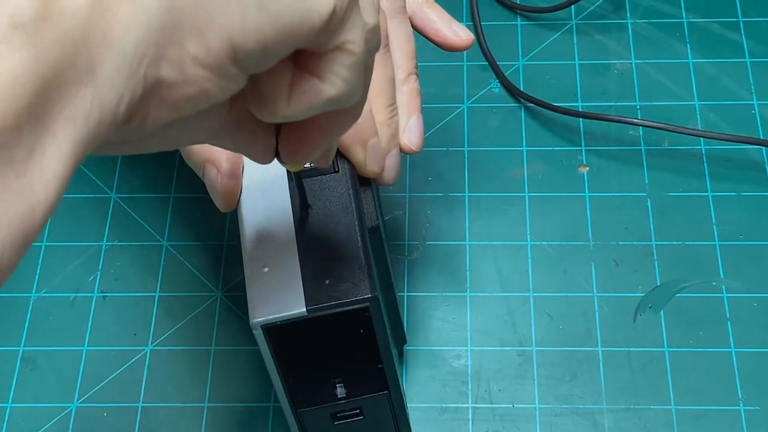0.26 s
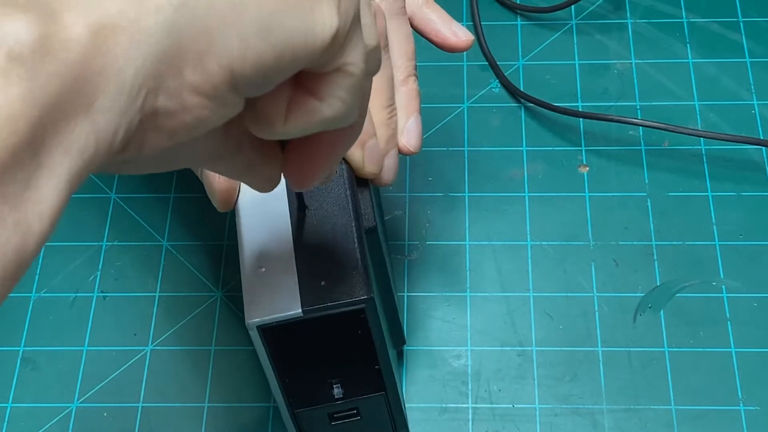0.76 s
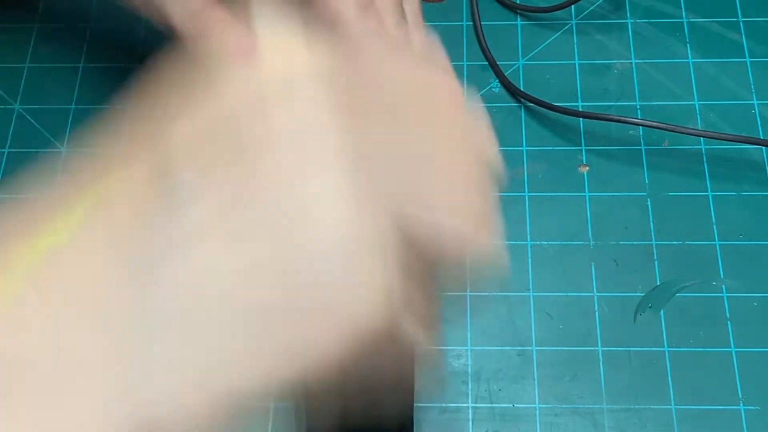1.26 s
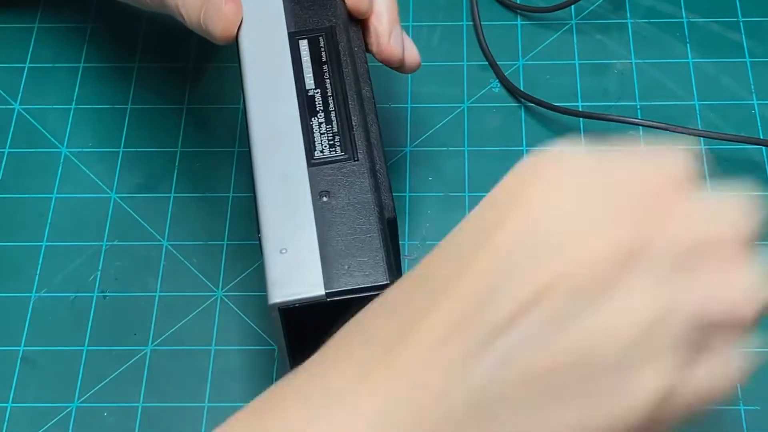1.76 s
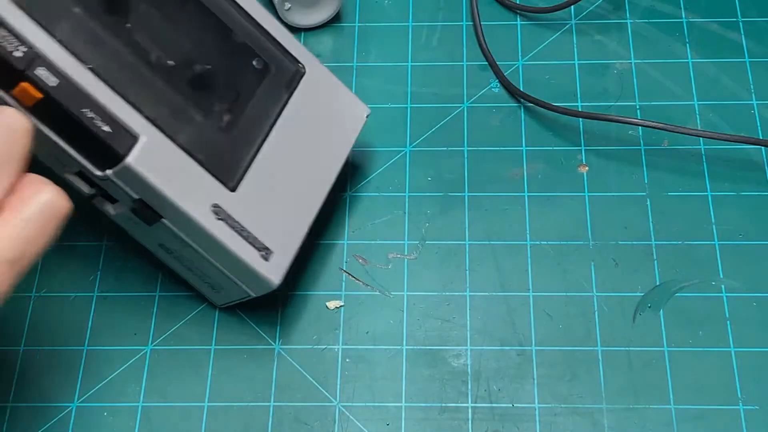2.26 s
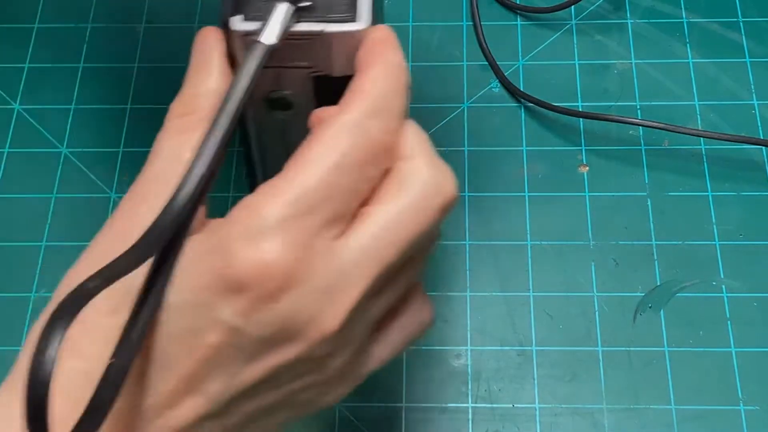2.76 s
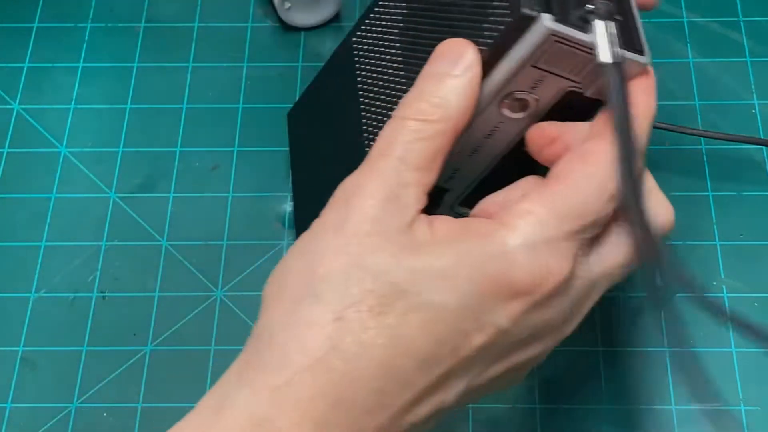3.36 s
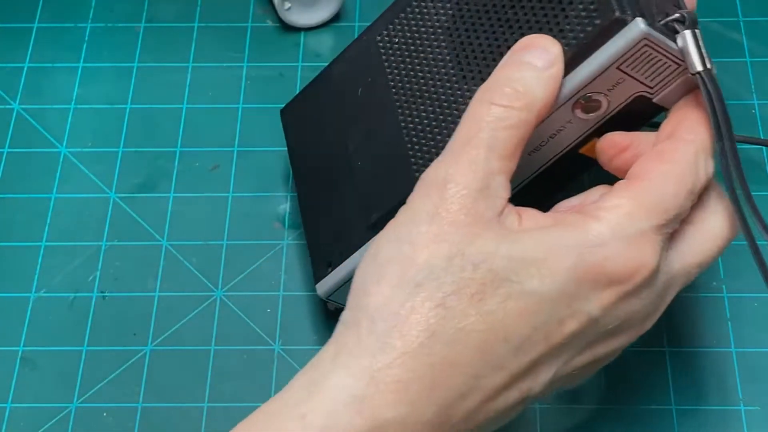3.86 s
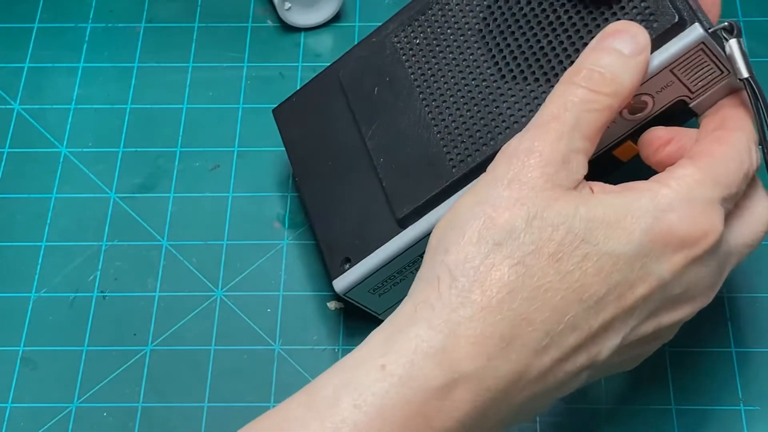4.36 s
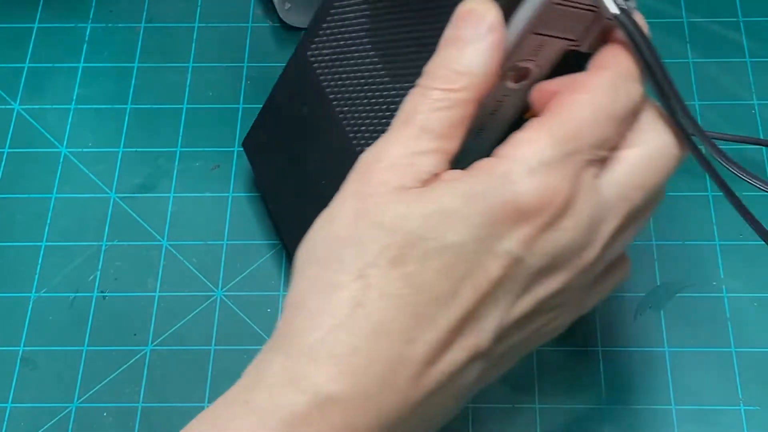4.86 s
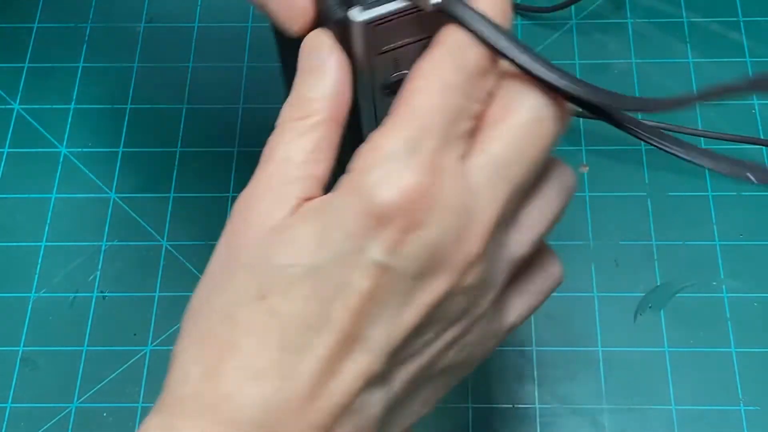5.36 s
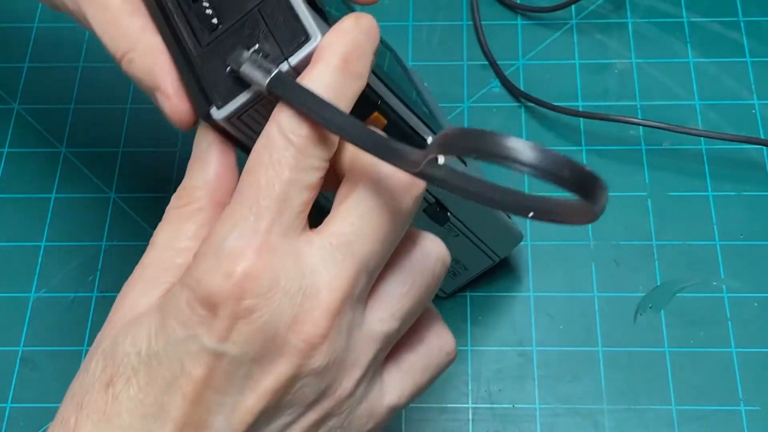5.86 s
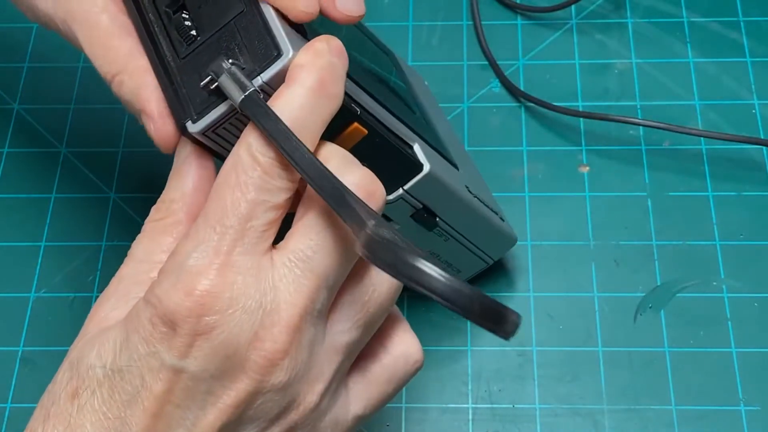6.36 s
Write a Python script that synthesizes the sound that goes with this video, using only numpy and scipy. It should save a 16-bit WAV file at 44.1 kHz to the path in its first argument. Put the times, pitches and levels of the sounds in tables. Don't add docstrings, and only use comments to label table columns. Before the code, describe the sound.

A small plastic-cased device is handled on a padded bench, close stereo microphone, light room tail. Quiet clicks and sliding skin come first, then a hard cracking blow with short metallic rattle, by far the loudest. A second lighter knock is followed by deep soft thumps, near silence with tiny taps, a rough plastic scrape and knock, and a few crisp closing clicks.

```python
import sys
import numpy as np
from scipy import signal
from scipy.fft import rfft, irfft, next_fast_len
from scipy.io import wavfile
from scipy.ndimage import uniform_filter1d

SR = 44100
rng = np.random.default_rng(int(sys.argv[2]) if len(sys.argv) > 2 else 0)


def invert_db(x):
    u = np.asarray(x, float) / 20
    return 10 ** u


def wrap_up_sound(samples):
    columns = np.atleast_2d(samples).T
    tamed = np.clip(columns, -1, 1)
    steps = np.round(tamed * 32767).astype(np.int16)
    wavfile.write(sys.argv[1], SR, steps)


N = 291942

# t/s, peak level/dB, crack above body/dB, panel f/Hz, left minus right/dB
TAPS = [(0.134, -56, -18, 2170, 5), (0.839, -58, -27, 1800, 0), (2.631, -43, -19.5, 1364, 19),
        (2.708, -44, -22, 1250, 6), (2.77, -36, -20, 1165, 6), (3.029, -53, -17, 1374, 7),
        (3.201, -53, -24, 1620, 3), (3.416, -36, -21, 2060, 2.5), (4.36, -47.5, -38.5, 657, -2),
        (5.099, -55, -13.5, 1390, -3.5), (5.12, -48, -22.5, 1524, 8), (5.732, -46.5, -27, 1320, 5),
        (5.75, -46.5, -26, 1080, 4), (5.955, -48, -22, 1380, 6), (6.007, -40, -32, 1813, 2.5),
        (6.171, -52.5, -33, 1600, 6)]
# t/s, peak level/dB, crack above body/dB, panel f/Hz, left minus right/dB
CLICKS = [(0.209, -52.5, -11, 2170, 3), (0.944, -33.5, -8, 2010, 4.5), (1.078, -34.5, -4.5, 1080, 8),
          (1.664, -34.5, -8.5, 1760, 5.5), (2.121, -50.5, -9, 794, -3), (2.15, -32, -10, 1000, -2),
          (2.393, -50, -13, 1537, 2), (2.545, -23, -13.5, 1128, 8.5), (3.328, -43, -14.5, 2506, 8),
          (3.915, -39.5, -13.5, 1618, -1), (4.888, -39, -4.5, 2274, 5.5), (5.625, -25, -6.5, 2722, 2.5),
          (5.654, -52, -14, 1400, 5), (6.26, -26, -3.5, 2450, 6.5)]
# t/s, peak level/dB, crack above body/dB, panel f/Hz, chatter/ms
KNOCKS = [(1.496, -11, -10.5, 3300, 1.9), (1.534, -10, -20, 950, 1.2), (1.542, 0.5, -8.5, 2280, 5),
          (1.559, -16.5, -18, 2916, 4), (2.515, -10, -3.5, 1260, 2.9), (2.524, -16.5, -18.5, 1294, 2.4),
          (5.372, -20, -18.5, 1306, 7.4), (1.497, -22.5, -32, 975, 6.4), (1.543, -15.5, -18, 791, 5.5),
          (1.497, -23, -40, 460, 3.9), (1.535, -20.5, -38.5, 396.8, 7), (1.652, -38.5, -39, 330, 7.7),
          (5.361, -29.5, -28.5, 1354, 1.78)]
# t/s, peak level/dB, crack above body/dB, panel f/Hz, chatter/ms
MORE_KNOCKS = [(1.102, -26, -1, 1240, 1.9), (1.128, -30.5, -8.5, 2020, 1.97), (1.176, -34, -13, 2290, 2.5),
               (1.295, -30.5, 6.5, 4260, 1), (1.464, -40.5, -9, 3102, 4), (1.0664, -40, -8.5, 1210, 3),
               (1.4988, -10, -9, 3540, 2), (1.5385, -13, -20, 1035, 1.8), (1.549, -9, -9.5, 2900, 2.5),
               (2.5187, -13, -4.5, 1312, 2.4), (2.5216, -15, -6, 1000, 2.5), (5.275, -39.5, -32, 1228, 3.05),
               (5.339, -33.5, -11.5, 3870, 1.5)]
TAP_CHATTER_MS, CLICK_CHATTER_MS, KNOCK_PAN_DB, MORE_KNOCK_PAN_DB = 6.3, 2.8, 4.5, 2.5
# f/Hz, level/dB, t60/s
CASING_MODES = [(330, -8.5, 0.043), (420, -2, 0.12), (536, -13, .035), (710, -11, 0.068), (870, -15, 0.026),
                (950, -8.5, 0.052), (1080, 6.5, 0.04), (1240, -4.5, 0.026), (1320, 6, 0.0082),
                (1420, 0.5, 0.033), (1572.3, -1.5, 0.085), (1923, 3.5, 0.03), (2014, -2, 0.04),
                (2450, 1.5, 0.015), (2830, 3.5, 0.066), (3030, 4, 0.005), (3300, 0, 0.007), (3550, -2, .02),
                (4030, 1.5, .02), (4290, 2.5, .02)]
# f/Hz, level/dB
CRACK_SPECTRUM = [(1500, -26.5), (3000, -12), (5000, -8.5), (6500, -6.5), (8000, -1.5), (10000, 2.5),
                  (12000, -2), (14000, -8), (15900, -8), (17000, -32)]

# t/s, f/Hz, peak level/dB, t60/s
STEEL_STRIKES = [
    (1.5435, 9800, -11, 0.03),
    (1.5445, 12800, -20, 0.06),
    (1.559, 8300, -23, .05),
    (1.5438, 6600, -29, 0.1),
    (1.6, 10500, -26, 0.04),
]
STEEL_MODES = [-0.071, 0.0011, 0, .017, 0.0028]

# t/s, hold/s, level/dB, rise/(s per 20 dB), fall/(s per 20 dB)
SCRAPES = [(0.0, .003, -60, .012, .05), (.06, .17, -77, .02, .1), (1.075, .06, -59, .016, .1),
           (1.19, .02, -60, .03, .06), (1.465, .02, -60, .02, .05), (1.505, .025, -38, .01, .02),
           (2.15, .02, -56, .03, .045), (2.42, .045, -65, .08, .05), (2.555, .004, -45, .021, .055),
           (2.636, .02, -52, .015, .06), (2.765, .02, -61, .14, .05), (2.86, .03, -67, .15, .25),
           (3.315, .03, -65, .05, .05), (3.92, .035, -57, .03, .06), (4.262, .1, -74, .18, .08),
           (4.976, .02, -73, .05, .15), (5.28, .06, -41, .03, .012), (5.38, .03, -40, .008, .06),
           (5.44, .02, -43, .03, .04), (5.35, .012, -56, .01, .01), (5.856, .005, -70, .1, .09),
           (6.335, .01, -63, .06, .07), (6.6, .03, -66, .08, .05)]
# t/s, hold/s, level/dB, rise/(s per 20 dB), fall/(s per 20 dB)
SWIPES = [(0.0, 0.0023, -57, .01, 0.032), (1.072, 0.0085, -53.5, .014, .04),
          (1.14, 0.092, -47.5, 0.073, .16), (1.305, 0.013, -54.5, .05, 0.19),
          (1.469, 0.0033, -54.5, .015, 0.042), (2.09, .04, -67.5, .05, .04), (2.43, 0.11, -61, .14, 0.057),
          (2.56, 0.0027, -49.5, .03, 0.051), (2.654, 0.0037, -56, 0.023, 0.101),
          (2.79, 0.0021, -59.5, 0.0412, 0.0356), (2.864, 0.018, -56.5, 0.0732, 0.088),
          (3.296, .1, -67.5, 0.041, 0.054), (3.92, 0.037, -60, 0.0301, 0.0596),
          (4.262, 0.0497, -73, 0.17, .15), (4.9, .003, -63.5, 0.0088, 0.0585),
          (4.99, .025, -66, 0.061, 0.0992), (5.264, .03, -59.5, 0.025, .1),
          (5.334, 0.0041, -48, 0.059, .018), (5.385, 0.0094, -42.5, .01, 0.065),
          (5.64, .003, -65, .01, 0.092), (6.275, 0.033, -62.5, .01, 0.126)]
# t/s, hold/s, level/dB, rise/(s per 20 dB), fall/(s per 20 dB)
DRAGS = [(1.078, 0.081, -59, 0.0167, 0.083), (2.134, 0.063, -61.5, 0.034, .035),
         (2.56, .003, -53, 0.039, 0.039), (2.76, 0.034, -52, 0.12, 0.034), (3.335, 0.011, -60.5, .07, 0.04),
         (3.92, .03, -66.5, .04, .05), (4.364, 0.0029, -53.5, .032, .06), (5.264, 0.11, -60, 0.016, 0.041),
         (5.385, .004, -40, 0.02, 0.033), (5.479, 0.00281, -57.5, .1, 0.025), (5.99, .03, -63.5, .06, .045)]
# delay/s, level re its peak/dB, fall/(s per 20 dB)
SETTLE = [
    (0.01, -28, 0.09),
    (.012, -34, 0.19),
]
# f/Hz, level/dB (per Hz for plastic and mat)
SCRAPE_SPECTRUM = [(530, -39), (900, -11), (1000, -5), (1110, -14), (1320, 0), (1530, -8), (1660, -1),
                   (2080, -10), (2470, -2), (3010, -9), (3960, -7), (4410, -20), (6500, -22), (8450, -52),
                   (14300, -120)]
SKIN_SPECTRUM = [(3000, -14), (5000, -6), (7500, -5), (9500, 1.5), (11500, 1.5), (13500, -4), (15500, -0.5),
                 (17000, -29.5)]
DRAG_SPECTRUM = [(120, -41), (200, -7), (501, -6.5), (651, -6.5), (936, -17.5), (1060, -7), (1500, -21.5),
                 (1950, -51), (3300, -120)]
STROKE_BEND = 1.4

# t/s, length/s, level/dB, start f/Hz, end f/Hz
RASPS = [(1.116, .12, -60, 3010, 2580), (1.131, .2, -59.5, 2101, 3594), (1.299, 0.18, -72, 2810, 3000),
         (5.267, 0.089, -53, 2503, 3710), (5.305, 0.037, -55, 7800, 7860),
         (5.324, 0.021, -50.5, 5000, 5580), (5.375, 0.11, -35.5, 2550, 2370), (5.378, .07, -43, 4000, 3850),
         (5.376, 0.12, -39, 1345, 1299), (5.373, 0.074, -52, 6600, 6280), (1.509, 0.03, -48, 3200, 2977),
         (1.552, .06, -36, 2900, 2700)]
RASP_WIDTH, RASP_EDGE_S, RASP_GRAIN_DB = .15, .01, 3.5
RASP_FALL_DB, RASP_SWELL_DB = -11, 7

# t/s, f/Hz, peak level/dB, t60/s
PINGS = [(0.9454, 1040, -46, 0.016), (0.945, 2660, -45.5, .02), (2.151, 1005, -49, 0.038),
         (3.196, 1054, -58, 0.039), (3.329, 2487, -46.5, 0.055), (3.329, 1040, -51.5, .05),
         (3.331, 1575, -52, .04), (3.418, 1664, -46, 0.037), (3.42, 1206, -54, 0.058),
         (4.889, 3200, -52.5, .02), (5.12, 1246, -46.5, 0.026), (5.122, 641, -43.5, 0.051),
         (5.15, 590, -60, 0.038), (5.626, 2650, -44, 0.025), (5.628, 888, -48.5, .04),
         (5.733, 2610, -55, 0.018), (5.751, 634, -53, 0.036), (5.751, 1890, -54, 0.025),
         (5.957, 1402, -53, 0.031), (5.956, 3610, -57, 0.014), (6.008, 3200, -52.5, .015),
         (6.172, 1590, -45.5, 0.038), (6.174, 994, -56, 0.028), (6.261, 2540, -40, 0.021),
         (6.262, 1420, -44, 0.045), (6.259, 3810, -48, .02), (6.263, 650, -49.5, 0.034),
         (1.177, 2810, -38, .03), (1.177, 1860, -42, .025), (1.5352, 4530, -17.5, .008)]
PING_ATTACK_S, PING_CHATTER_S, PING_PAN_DB, PING_TRIM_DB = .001, .001, 3, -3.5
PING_GRIP = 0.83

# t/s, peak level/dB, f/Hz, t60/s
BOOMS = [(0.094, -42, 86.5, 0.25), (0.225, -47.5, 82, 0.23), (0.48, -51.5, 84, 0.15),
         (0.523, -55, 75, 0.088), (0.564, -53, 67, 0.17), (1.154, -40, 86, 0.24), (1.179, -46, 173.2, 0.3),
         (1.208, -38, 70, 0.089), (1.366, -52, 51.4, 0.3), (1.494, -34.5, 138.8, 0.78),
         (1.533, -26, 139.7, 0.28), (1.651, -46, 72, 0.17), (1.762, -54, 67, 0.41),
         (2.409, -48.5, 61.5, 0.28), (2.441, -50.5, 48.9, 0.12), (2.544, -32.5, 71.5, 0.22),
         (2.613, -47, 66, 0.31), (2.734, -31.5, 83.2, 0.28), (2.781, -25, 117.7, 0.18),
         (2.808, -26, 85.6, 0.18), (3.922, -47, 79.7, 0.32), (5.379, -21.5, 79, 0.31),
         (5.419, -25.5, 67, 0.11)]
# multiple of f, level/dB, share of t60
BENCH_MODES = [
    (1, 2.5, 0.59),
    (.62, -9, 1.1),
    (2.2, -12, 0.58),
    (3.8, -19, .6),
]
# t/s, level/dB
RUMBLE = [(0.0, -59), (0.31, -72.5), (0.44, -69), (0.81, -85), (1.03, -65), (1.691, -63), (1.94, -73),
          (2.38, -72), (2.49, -58), (2.621, -65), (2.75, -57), (3.02, -67.5), (3.89, -73.5), (4.1, -90),
          (5.179, -81), (5.4, -55), (5.62, -67.5), (6.62, -74)]
# f/Hz, level/dB
RUMBLE_SPECTRUM = [(30, -22.0), (45, 0.5), (60, -8), (82, 0), (110, -10.0), (170, -8.5), (250, -24.5)]

# f/Hz, near level/dB, near t60/s, far level/dB, far t60/s
ROOM = [(517, -11.5, 0.35, -22, 1), (1500, -6.5, 0.12, -22.5, 1.5), (4100, -7.5, 0.16, -23, 1.1),
        (10100, -14.5, 0.21, -27.5, 1.1), (15000, -16, .17, -30.5, 1.1)]
# f/Hz, level/dB per Hz
HISS_SPECTRUM = [(15, -41), (25, -11), (49, -3), (123, -13), (241, -18.5), (437, -17.5), (655, -24),
                 (730, -23), (858, -24), (1060, -25), (1390, -27), (3890, -32.5), (15800, -39.5)]
HISS_DB = -70
SHARED_HZ, LAG_S, IN_PHASE_HZ = 5900, .000222, 6950


def taps():
    out, t = np.zeros((2, N)), np.arange(4096) / SR
    hz, db, t60 = np.array(CASING_MODES).T
    light = [(*row, TAP_CHATTER_MS) for row in TAPS] + [(*row, CLICK_CHATTER_MS) for row in CLICKS]
    knocks = [(*row[:-1], KNOCK_PAN_DB, row[-1]) for row in KNOCKS]
    ticks = [(*row[:-1], MORE_KNOCK_PAN_DB, row[-1]) for row in MORE_KNOCKS]
    hits = knocks + sorted(light) + ticks
    chance = rng.standard_normal((len(hits), 4096 * 2 + 5 * len(CASING_MODES)))
    sides = np.array([[1], [-1]])
    for (s, peak_db, crack_db, spot_hz, pan_db, ms), c in zip(hits, chance):
        chatter = np.exp(-t / (max(ms, .3) / 1000))
        force = c[:1024] * invert_db(c[1024:2048]) * chatter[:1024]
        force[0] = 6.0
        size, tilt, phase, other, grip = c[8192:].reshape(5, -1)

        softness = 1 - invert_db(min(crack_db, 0))
        reach = 0.97 + .5 * (1 - softness)
        near = 1 / (1 + (np.log(hz / spot_hz) / reach) ** 2) ** 2
        gain = invert_db(db + 1.5 * size + 1.1 * tilt * sides) * near
        gain = gain * np.exp(1j * (phase + 0.65 * other * sides))

        modes = fade(t, np.minimum(t60, .007 + 20 / hz)[:, None])
        modes = modes * np.exp(2j * np.pi * (hz * (1 + 0.03 * grip))[:, None] * t)
        spot = np.sin(2 * np.pi * spot_hz * t) * fade(t, min(40 / spot_hz, .03))
        ring = (gain @ modes).imag + 3.5 * softness * spot

        edges_hz = .62 * spot_hz, min(spot_hz * (1.8 + 14 * invert_db(crack_db)), 9000)
        ring = signal.sosfilt(signal.butter(2, edges_hz, "band", fs=SR, output="sos"), ring)
        body = signal.fftconvolve(ring, force[None])[:, :4096]

        crack_decay = chatter + .5 * np.exp(-t / .0005) + .13 * fade(t, .11)
        crack = colour(c[4096:8192], CRACK_SPECTRUM) * crack_decay * (1 - np.exp(-t / .0001))
        hit = body / abs(body).max() + invert_db(crack_db + 9.5) * crack / abs(crack).max()
        hit = hit * np.cos(np.linspace(0, np.pi / 2, 4096))
        add(out, hit / abs(hit).max() * invert_db(peak_db + pan_db * sides / 2), s + .001)
    return out


def blade():
    out, t = np.zeros((2, N)), np.arange(SR // 3) / SR
    for (s, hz, peak_db, t60), c in zip(STEEL_STRIKES, rng.standard_normal((len(STEEL_STRIKES), 512))):
        ring = sum(np.sin(2 * np.pi * hz * (1 + share) * t) for share in STEEL_MODES) * fade(t, t60)
        hit = signal.fftconvolve(ring, c * np.exp(-t[:512] / .002))
        add(out, np.array([hit, hit]) * invert_db(peak_db) / abs(hit).max(), s)
    return out


def rubbing():
    plastic_gain = strokes(SCRAPES + settling(TAPS + CLICKS, SETTLE[0]))
    skin_gain = strokes(SWIPES)
    mat_gain = strokes(DRAGS + settling(TAPS, SETTLE[1]))
    plastic_grain = invert_db(2.8 * walk(800) + .8 * walk(60))
    scrape = unit(colour(pair(900) * plastic_grain, SCRAPE_SPECTRUM))
    skin_grain = invert_db(2.1 * walk(500) + 1.1 * walk(40))
    skin = unit(colour(rng.standard_normal(N) * skin_grain, SKIN_SPECTRUM))
    drag = unit(colour(pair(930) * invert_db(1.5 * walk(120)), DRAG_SPECTRUM))
    return (scrape * plastic_gain + drag * mat_gain) * [[1.15], [.87]] + skin * skin_gain * 0.92


def settling(contacts, settle):
    delay, db, fall = settle
    return [(row[0] + delay, 0, row[1] + db, delay, fall) for row in contacts]


def strokes(rows):
    t, gain = np.arange(N) / SR, np.zeros(N)
    for s, hold, db, rise, fall in rows:
        i = max(int((s - 3 * rise) * SR), 0)
        j = int((s + hold + 3 * fall) * SR)
        outside = np.maximum((s - t[i:j]) / rise, (t[i:j] - s - hold) / fall)
        stroke = invert_db(db - 20 * np.maximum(0, outside) ** STROKE_BEND)
        gain[i:j] = np.hypot(gain[i:j], stroke)
    return gain


def rasps():
    out, blows = np.zeros((2, N)), np.array([row[0] for row in KNOCKS + MORE_KNOCKS])
    for s, length, db, from_hz, to_hz in RASPS:
        n = int(length * SR)
        u = np.arange(n) / n
        slips = rng.standard_normal((3, 12288))
        grain = invert_db(RASP_GRAIN_DB * unit(uniform_filter1d(slips[2], size=110)))
        force = (slips[0] + .5 * slips[:2]) * grain
        sway = signal.lfilter(*signal.butter(2, RASP_WIDTH * from_hz, fs=SR), force)[:, -n:]
        phase = 2 * np.pi * np.cumsum(from_hz + (to_hz - from_hz) * u) / SR
        struck = np.any((s - blows > 0) & (s - blows < .025))
        course_db = (RASP_FALL_DB if struck else RASP_SWELL_DB) * u
        edge = np.clip(np.minimum(u, 1 - u) * length / RASP_EDGE_S, 0, 1)
        add(out, unit(sway * np.sin(phase)) * edge * invert_db(db + course_db) * [[1.15], [.87]], s)
    return out


def pings():
    out, t = np.zeros((2, N)), np.arange(4096) / SR
    pan_db = np.array([[PING_PAN_DB], [-PING_PAN_DB]]) / 2
    for (s, hz, peak_db, t60), c in zip(PINGS, rng.standard_normal((len(PINGS), 256))):
        ring = np.sin(2 * np.pi * hz * t) * fade(t, PING_GRIP * t60) * (1 - np.exp(-t / PING_ATTACK_S))
        ring = signal.fftconvolve(ring, c * np.exp(-t[:256] / PING_CHATTER_S))
        add(out, ring / abs(ring).max() * invert_db(peak_db + PING_TRIM_DB + pan_db), s - .0005)
    return out


def booms():
    out, t = np.zeros((2, N)), np.arange(SR // 2) / SR
    for s, peak_db, hz, t60 in BOOMS:
        swing = sum(invert_db(db) * np.sin(2 * np.pi * k * hz * t) * fade(t, share * t60)
                    for k, db, share in BENCH_MODES)
        swing = swing * (1 - np.exp(-t / 0.0089))
        late = np.roll(swing, int(.0005 * SR))
        add(out, np.array([.94 * late, 1.06 * swing]) * invert_db(peak_db) / abs(swing).max(), s)
    s, db = np.transpose(RUMBLE)
    lean = unit(colour(pair(300), RUMBLE_SPECTRUM))
    return out + lean * invert_db(np.interp(np.arange(N) / SR, s, db) + 2.4 * walk(23))


def room(x):
    t, tail = np.arange(SR) / SR, 0
    onset = np.clip(t / 0.0034 - .3, 0, 1)
    for hz, near_db, near_t60, far_db, far_t60 in ROOM:
        band_shape = [(hz / 3, -20), (hz / 1.6, 0), (hz * 1.3, 0), (hz * 2, -20)]
        band = unit(colour(pair(300)[:, :len(t)], band_shape))
        slopes = sum(invert_db(db) * fade(t, t60) / np.sqrt(t60 * SR / 14)
                     for db, t60 in ((near_db, near_t60), (far_db, far_t60)))
        tail = tail + band * slopes * onset * np.sqrt(hz / 15000)
    return signal.fftconvolve(tail, x.mean(axis=0)[None])[:, :N]


def hiss():
    return unit(colour(pair(500), HISS_SPECTRUM[2:])) * invert_db(HISS_DB + 4.0 + .7 * walk(2.9))


def colour(x, points):
    hz, db = np.transpose(points)
    n = next_fast_len(x.shape[-1])
    f = np.maximum(np.fft.rfftfreq(n, 1 / SR), 1)
    shape_db = np.interp(np.log(f), np.log(hz), db, left=db[0] - 21.0, right=db[-1] - 17.0)
    return irfft(rfft(x, n) * invert_db(shape_db), n)[..., :x.shape[-1]]


def unit(x):
    return x / np.sqrt(np.mean(x ** 2))


def pair(alike_hz):
    mid, side = rng.standard_normal((2, N))
    side = signal.lfilter(*signal.butter(1, alike_hz, "high", fs=SR), side)
    return np.array([mid + side, mid - side])


def walk(rate):
    k = int(SR / rate)
    held = np.repeat(rng.standard_normal(N // k + 1), k)
    return 0.86 * uniform_filter1d(uniform_filter1d(held, k), k)[:N]


def fade(t, t60):
    return np.exp(-np.log(1000) * t / t60)


def add(out, x, s):
    i = int(s * SR)
    out[:, i:i + x.shape[1]] += x[:, :out.shape[1] - i]


def scene():
    near = taps() + blade() + rubbing() + rasps() + pings()
    return near + room(near) + booms() + hiss()


def top_cut(x):
    return signal.sosfilt(signal.butter(12, 15980, fs=SR, output="sos"), x)


def record(dry):
    f = np.fft.rfftfreq(N, 1 / SR)
    share = 1 / (1 + (SHARED_HZ / np.maximum(f, 1)) ** 12)
    left, right = rfft(dry) / np.sqrt(1 + (38 / np.maximum(f, 1)) ** 12)
    lead = np.exp(2j * np.pi * (f - IN_PHASE_HZ) * LAG_S)
    right = np.sqrt(1 - share) * right + np.sqrt(share) * left * lead
    mix = np.clip(irfft(np.array([left, right]), N), -1, 1)
    return top_cut(mix)


dry = scene()
out = record(dry)
wrap_up_sound(out)
```